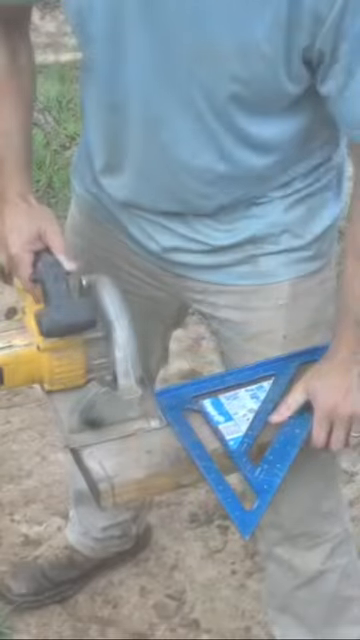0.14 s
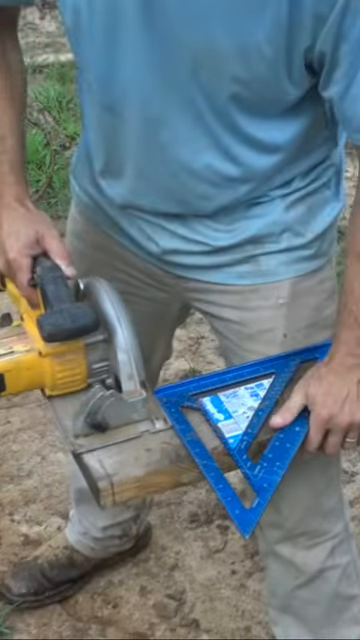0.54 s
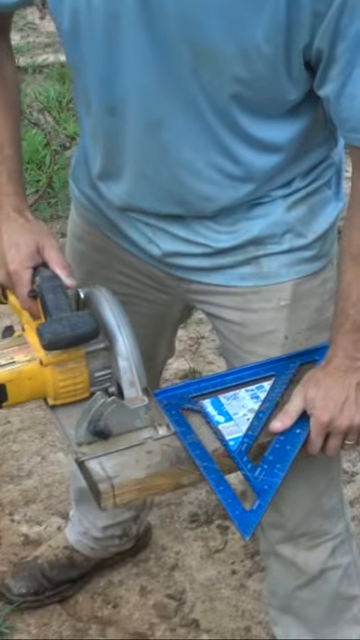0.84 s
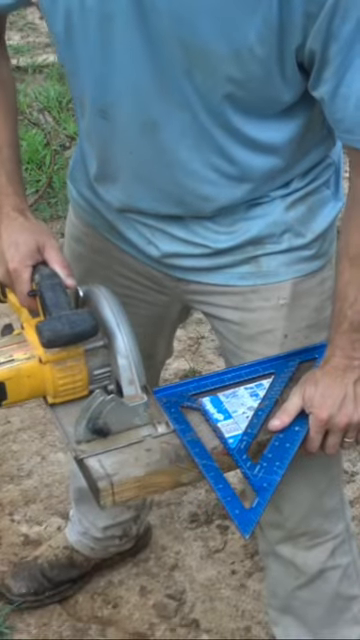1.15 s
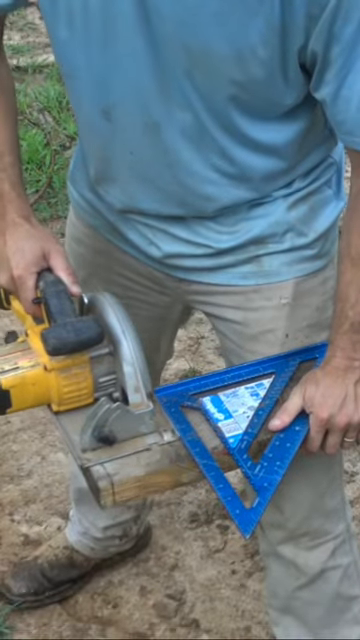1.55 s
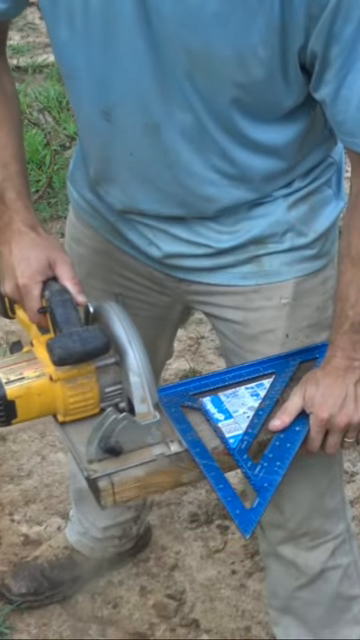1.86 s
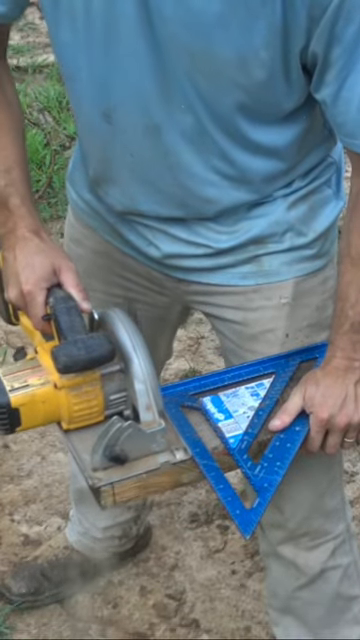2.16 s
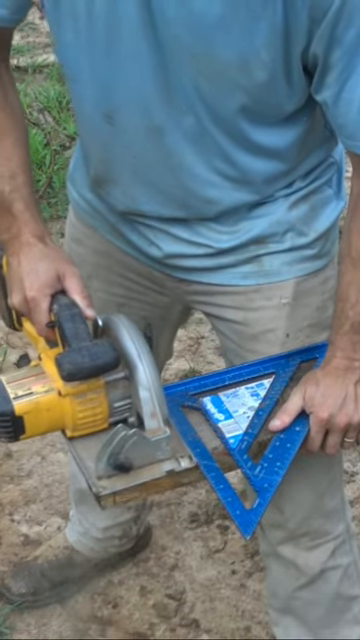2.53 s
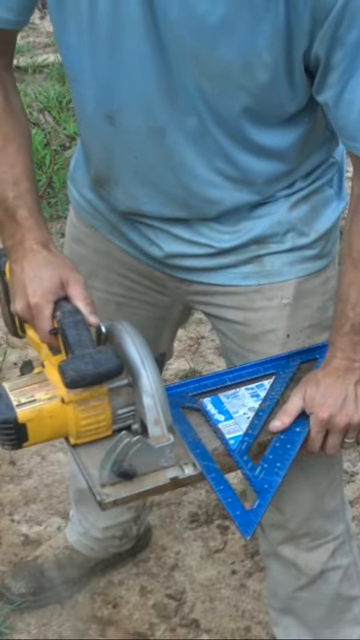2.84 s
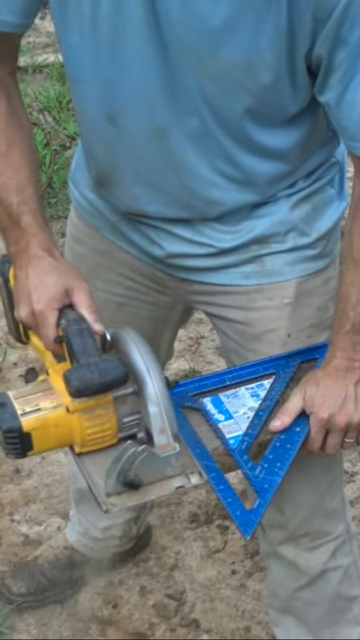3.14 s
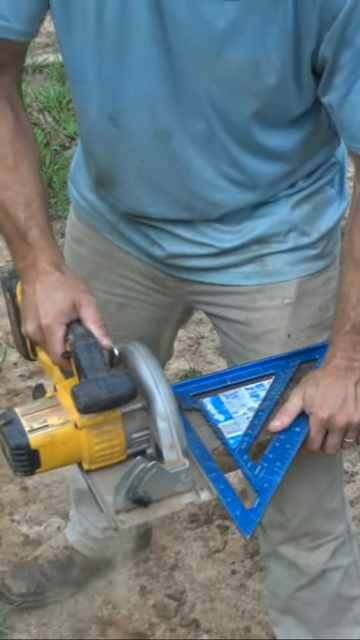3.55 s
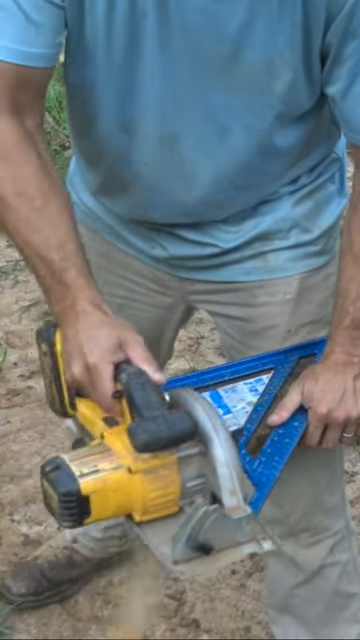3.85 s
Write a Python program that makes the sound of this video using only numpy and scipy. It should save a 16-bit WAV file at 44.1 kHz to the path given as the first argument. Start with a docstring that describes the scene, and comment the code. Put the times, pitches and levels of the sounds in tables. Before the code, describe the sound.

Handheld circular saw spins up with a sharp click, screams through wood, then stops with a clack

```python
"""After a moment of silence, insects shrill in a yard, to the left, over quiet air: coloured noise.
Close to the microphone a circular saw is lined up with soft knocks and slides; its trigger clicks twice.
The motor spins up through resonances; the blade cuts a board, labours, breaks free and is braked, the guard clacking.
Motor phase drives a rasp that repeats with every blade turn, a geared whine and singing blade harmonics;
hissing chips and rattle are noise with levels set over time."""
import sys
import numpy as np
from scipy import signal
from scipy.fft import rfft, irfft
from scipy.io import wavfile
from scipy.ndimage import uniform_filter1d

SR = 44100
rng = np.random.default_rng(int(sys.argv[2]) if len(sys.argv) > 2 else 0)


def materialize(psi):
    """Save the field psi as 16-bit PCM at rate SR to the path in sys.argv[1].

    A 1-D psi becomes a single channel; in a 2-D psi each row is a channel.
    """
    bounded = np.clip(np.atleast_2d(psi).T, -1, 1)
    quanta = np.round(bounded * 32767).astype(np.int16)
    wavfile.write(sys.argv[1], SR, quanta)


N = 176400
T = np.arange(N) / SR
FREQS = np.maximum(np.fft.rfftfreq(N, 1 / SR), 1)

# mean motor speed: t/s, rate/(turns per s)
MOTOR_SPEED = [(1.15, 2), (1.18, 55), (1.27, 182), (1.31, 224), (1.36, 299), (1.4, 343), (1.45, 372),
               (1.54, 390), (1.7, 360), (1.8, 347), (1.97, 333), (2.2, 331.5), (2.3, 342), (2.4, 344.5),
               (2.57, 335), (2.72, 334), (2.9, 323), (3, 312), (3.2, 265), (3.29, 256), (3.44, 281),
               (3.58, 290), (3.67, 334), (3.8, 386), (3.9, 412), (3.92, 355), (4, 100)]
PINION_TEETH, WHEEL_TEETH = 9, 46
# resonances of guard and housing: f/Hz, width/Hz, level/dB
HOUSING_MODES = [(912, 144, 5), (1513, 16, 7.5), (1663, 39, 8), (2270, 840, 6), (5540, 71, -5.5),
                 (5940, 160, -12.5), (6760, 51, -3.5), (8720, 45, 5.5), (11990, 190, -13)]


def undb(db):
    """Decibels to gain."""
    return 10 ** (np.asarray(db) / 20)


def unit(x):
    """Scale to rms 1."""
    return x / np.sqrt(np.mean(x ** 2) + 1e-18)


def curve(table, axis=1):
    """One column of a time table, joined by straight lines."""
    rows = np.array(table, float)
    return np.interp(T, rows[:, 0], rows[:, axis])


def response(points):
    """Gain per frequency from (f/Hz, level/dB) points, joined on a log frequency axis."""
    rows = np.array(points, float)
    return undb(np.interp(np.log(FREQS), np.log(rows[:, 0]), rows[:, 1]))


def shaped(x, gain):
    """Filter by a gain per frequency."""
    return irfft(rfft(x) * gain, N)


def noise(colour):
    """Coloured noise of rms 1."""
    return unit(shaped(rng.standard_normal(N), response(colour)))


def walk(rate_hz):
    """Smooth random wander up to about a rate, spread 1."""
    return unit(shaped(rng.standard_normal(N), 1 / (1 + (FREQS / rate_hz) ** 4)))


def wide_noise(colour):
    """Stereo noise: one part shared by both channels, a weaker part of its own in each."""
    own = np.array([noise(colour), noise(colour)])
    return unit(noise(colour) + 0.5 * own)


def yard():
    """An unevenly throbbing insect chorus to the left, over quiet outdoor air."""
    # spectrum of the insects: f/Hz, level/dB
    insect_colour = [(4000, -35.5), (4400, -17), (4650, -1.5), (4830, 1.5), (5050, -6.5), (5350, -12),
                     (6000, -26.5), (7600, -32.5), (8300, -26.5), (8800, -33), (9800, -23.5), (10800, -40),
                     (16000, -48)]
    # spectrum of the outdoor air: f/Hz, level/dB
    air_colour = [(25, -18), (75, -3), (194, -5.5), (299, -9.5), (1050, -10), (1410, -19), (3500, -22),
                  (4550, -51), (7700, -120)]
    insect_db, air_db = -38, -59.5
    throb_db, throb_hz = 1, 34
    left_minus_right_db = 5.3
    throb = undb(throb_db * walk(throb_hz))
    chorus = unit(noise(insect_colour) * throb) * undb(insect_db)
    pan = undb(np.array([[left_minus_right_db], [-left_minus_right_db]]) / 2)
    return chorus * pan + wide_noise(air_colour) * undb(air_db)


def draught():
    """Air moved by the spinning blade rumbles on the microphone, in proportion to motor speed."""
    # spectrum of the rumble: f/Hz, level/dB
    draught_colour = [(25, -14), (70, 5), (150, 0), (400, -23), (2000, -60)]
    full_speed_db, wander_db = -61.5, 2
    level = undb(full_speed_db + wander_db * walk(11.0))
    speed = curve(MOTOR_SPEED)
    return wide_noise(draught_colour) * level * speed / speed.max()


def fade(start_s, t60_s):
    """A sudden rise and an exponential decay."""
    age = np.maximum(T - start_s, 0)
    return (1 - np.exp(-age / 0.0001)) * np.exp(-np.log(1000) * age / t60_s)


def hits(table, colour):
    """Short noise bursts ring the struck part, each with a faint tail."""
    tail_db, tail_t60_s = -19, 0.13  # tail relative to its burst
    envelope = 0
    for start_s, db, t60_s in table:
        tail = undb(tail_db) * fade(start_s, tail_t60_s)
        envelope = envelope + undb(db) * (fade(start_s, t60_s) + tail)
    bursts = rng.standard_normal(N) * envelope
    # folding the cepstrum makes the filter minimum phase: nothing rings ahead of the blow
    cepstrum = irfft(np.log(unit(response(colour))), N)
    causal = np.concatenate([cepstrum[:1], 2 * cepstrum[1:N // 2]])
    return shaped(bursts, np.exp(rfft(causal, N)))


def handling():
    """The saw is lined up, the trigger clicks, the blade pings at the jolt, the guard clacks."""
    # soft knocks of the saw being set on the board: t/s, level/dB, t60/s
    knocks = [(.408, -48, 0.15), (.44, -42, 0.11), (.501, -48.5, 0.15), (.603, -47, 0.11),
              (.678, -46.5, 0.06), (.708, -51, 0.055)]
    # spectrum of the knocks: f/Hz, level/dB
    knock_colour = [(80, -31), (280, -6), (420, -10), (600, 0.5), (850, -18), (1200, -13), (1550, -12),
                    (2000, -22), (5000, -32)]
    # the shoe slides on the wood: middle t/s, half length/s, level/dB
    slide_times = [(0.6, 0.092, -53), (0.915, 0.12, -59)]
    # spectrum of the slides: f/Hz, level/dB
    slide_colour = [(1500, -10), (2080, -2), (2500, -10), (3150, 0.5), (6000, -19)]
    # trigger clicks: t/s, level/dB, t60/s
    clicks = [(.938, -53, .015), (1.069, -39, 0.16), (1.0915, -13, 0.024), (1.1445, -12, 0.065)]
    # spectrum of the clicks: f/Hz, level/dB
    click_colour = [(100, -30), (621, -1), (872, -2), (1830, 7), (2270, -6), (2580, 4), (3320, -6),
                    (4200, -6.5), (5900, -3), (6420, -16), (7940, -5.5), (10000, -13.5), (16000, -29)]
    # the guard clacks as the saw leaves the board: t/s, level/dB, t60/s
    clacks = [(3.9, -24, 0.11), (3.976, -14.5, 0.12)]
    # spectrum of the clacks: f/Hz, level/dB
    clack_colour = [(80, -22), (300, 2.5), (450, -8.5), (620, 1), (810, 7), (950, -8), (1500, -1),
                    (2500, 0.5), (5000, -13), (12000, -34)]
    ping_s, ping_hz, ping_db, ping_t60_s = 1.146, 3935, -27.5, 0.62
    strokes = 0
    for middle_s, length_s, db in slide_times:
        strokes = strokes + undb(db) * np.exp(-((T - middle_s) / length_s) ** 2)
    slides = noise(slide_colour) * strokes
    ping = undb(ping_db) * fade(ping_s, ping_t60_s) * np.sin(2 * np.pi * ping_hz * T)
    struck = hits(knocks, knock_colour) + hits(clicks, click_colour) + hits(clacks, clack_colour)
    return slides + ping + struck


def swells(table):
    """Short swells of noise, each in one resonance."""
    out = 0
    for middle_s, length_s, hz, width_hz, db in table:
        shape = np.exp(-((T - middle_s) / length_s) ** 2)
        resonance = 1 / (1 + ((FREQS - hz) / (width_hz / 2)) ** 4)
        ring = shape * shaped(rng.standard_normal(N), resonance)
        out = out + undb(db) * ring * np.linalg.norm(shape) / np.linalg.norm(ring)
    return out


def flares():
    """Housing resonances flare as the motor spins up through them."""
    # middle t/s, half length/s, f/Hz, width/Hz, level/dB
    flare_times = [(1.225, .012, 2200, 600, -24), (1.29, .07, 510, 90, -31), (1.31, .03, 1350, 200, -26)]
    return swells(flare_times)


def bites():
    """The teeth bite and snatch in the last of the wood, in short resonant bursts."""
    # middle t/s, half length/s, f/Hz, width/Hz, level/dB
    bite_times = [(3.558, .014, 1700, 800, -21), (3.573, .005, 1100, 400, -21),
                  (3.612, .012, 3800, 1400, -17.5), (3.617, .014, 950, 200, -22),
                  (3.643, .005, 1100, 450, -21), (3.835, .007, 1150, 350, -23)]
    return swells(bite_times)


def rattle():
    """Slack gears and blade give dense uneven metal ticks: decaying noise bursts at chance times."""
    # level of the rattle: t/s, level/dB
    rattle_level = [(1.15, -40), (1.25, -21), (1.45, -24), (1.7, -32.5), (3.26, -36), (3.3, -19.5),
                    (3.39, -16.5), (3.47, -31), (3.57, -20), (3.75, -29), (3.91, -20), (4, -40)]
    # spectrum of the rattle: f/Hz, level/dB
    rattle_colour = [(100, -46), (600, -26), (1000, -1), (1700, 5.5), (3500, -0.5), (16000, -18)]
    ticks_per_s, scatter_db, t60_s = 1300, 2, 0.021
    ticks = (rng.random(N) < ticks_per_s / SR) * undb(scatter_db * rng.standard_normal(N))
    decay = np.exp(-np.log(1000) / (t60_s * SR))
    bursts = signal.lfilter([1], [1, -decay], ticks)
    metal = unit(shaped(bursts * rng.standard_normal(N), response(rattle_colour)))
    return metal * undb(curve(rattle_level))


def turn_orders(turns, orders, gains):
    """Multiples of the blade rate, each at a chance phase, rms 1 together."""
    phases = rng.random(len(orders))
    return unit(sum(g * np.sin(2 * np.pi * (k * turns + p)) for k, g, p in zip(orders, gains, phases)))


def sing(turns):
    """A cluster of blade harmonics swells while the blade is deep in the wood; a few ring out alone."""
    # level of the cluster in the kerf: t/s, level/dB
    sing_level = [(1.3, -46), (2.3, -27), (2.95, -23.5), (3.3, -36), (3.9, -62)]
    # single harmonics that ring up: middle t/s, half length/s, multiple of the blade rate, level/dB
    squeals = [(2.38, .13, 74, -28), (2.47, .05, 72, -26), (2.52, .06, 77, -24), (2.67, .15, 78, -24),
               (2.68, .12, 70, -28), (2.72, .12, 69, -30), (2.36, .12, 83, -30), (3.135, .065, 94, -25.5),
               (2.35, .35, 14, -37), (2.9, .2, 15, -38), (2.85, .1, 79, -28), (1.88, .13, 26, -31),
               (2.25, .2, 27, -32), (2.03, .1, 23, -33), (3.03, .17, 3, -53), (3.33, .04, 32, -26),
               (3.4, .035, 80, -30)]
    centre_order, width_orders = 73, 30  # multiples of the blade rate
    cluster_flicker_db, squeal_flicker_db = 2, 3
    orders = np.arange(62, 92)
    gains = 1 / (1 + ((orders - centre_order) / (width_orders / 2)) ** 2)
    cluster = turn_orders(turns, orders, gains)
    lone = 0
    for middle_s, length_s, order, db in squeals:
        level = undb(db + squeal_flicker_db * walk(42))
        swell = np.exp(-((T - middle_s) / length_s) ** 4)
        lone = lone + level * swell * turn_orders(turns, [order], [1])
    return cluster * undb(curve(sing_level) + cluster_flicker_db * walk(40)) + lone


def whine(motor):
    """Pinion teeth mesh in a tone that smears into a noisy band when slack; the rotor hums beneath."""
    # gear whine: t/s, level/dB, roughness/(0-1, clipped)
    mesh_level = [(1.16, -45, 0.8), (1.21, -21, 0.47), (1.31, -16.5, 0.68), (1.46, -28, 0.9),
                  (1.56, -26.5, .1), (1.68, -32, 0.94), (1.85, -25, .1), (2.1, -42, .4), (2.4, -24, 0),
                  (2.75, -40, 0.3), (3.19, -22, 0.3), (3.39, -24.5, 0), (3.46, -15, 0.2), (3.53, -23, 0.3),
                  (3.59, -31, 0.9), (3.68, -27, .4), (3.82, -32, 0.6), (3.96, -16.5, 1), (4, -22.5, 1.1)]
    # octave of the gear whine: t/s, level/dB
    octave_level = [(1.16, -40), (1.4, -25.5), (1.6, -21.5), (1.72, -30), (2.05, -26), (2.6, -31),
                    (3.3, -37), (3.52, -21), (3.6, -28), (3.85, -27), (4, -51)]
    # hum at the motor rate: t/s, level/dB
    hum_level = [(1.2, -69), (1.45, -39.5), (1.6, -45.5), (2.1, -53), (2.4, -46), (2.75, -44.5), (3, -53.5),
                 (3.6, -50.5), (3.8, -40.5), (3.92, -40.5), (4, -59)]
    # tone of the free-running motor at three times its rate: t/s, level/dB
    fan_level = [(1.2, -72), (1.4, -44), (1.7, -33.5), (3.7, -46), (3.83, -30.5), (3.9, -21), (3.94, -50)]
    sideband_rad, skirt_hz, octave_rough = 0.5, 140, 0.8
    mesh_flicker_db, hum_flicker_db = 1.8, 0.42
    roughness = np.clip(curve(mesh_level, axis=2), 0, 1)
    parts = [(1, curve(mesh_level), roughness), (2, curve(octave_level), octave_rough)]
    out = 0
    for k, db, rough in parts:
        skirt = (walk(k * skirt_hz) + 1j * walk(k * skirt_hz)) / np.sqrt(2)
        # the phase wobbles once per motor turn, which adds sidebands
        wobble = sideband_rad * np.sin(2 * np.pi * (motor + rng.random()))
        tone = np.exp(1j * (2 * np.pi * k * PINION_TEETH * motor + wobble))
        mesh = (np.sqrt(1 - rough ** 2) + rough * skirt) * tone
        out = out + undb(db + mesh_flicker_db * walk(17)) * mesh.real
    hum = undb(curve(hum_level)) * np.sin(2 * np.pi * motor)
    fan = undb(curve(fan_level)) * np.sin(2 * np.pi * 3 * motor)
    return np.sqrt(2) * (out + (hum + fan) * undb(hum_flicker_db * walk(18)))


def per_turn(turns):
    """A random pattern around the blade that comes back each turn and slowly changes."""
    memory = 0.918  # share of the pattern kept from one turn to the next
    pattern = rng.standard_normal((260, 512))  # turns, points around the blade
    pattern[0] /= np.sqrt(1 - memory ** 2)  # the first turn is as strong as the later ones
    drifting = signal.lfilter([1], [1, -memory], pattern, axis=0)
    track = signal.resample_poly(drifting.ravel(), 4, 1)  # now 2048 points a turn
    return unit(np.interp(turns * 2048, np.arange(len(track)), track))


def blade_modes():
    """The steel blade's many narrow modes, spaced by chance: peaks and dips above the first housing mode."""
    ripple_db, mode_hz = 1.1, 45
    size = int(mode_hz * N / SR)
    smooth = uniform_filter1d(rng.standard_normal(len(FREQS)), size)
    ripple = unit(uniform_filter1d(smooth, size))
    onset = np.clip(FREQS / HOUSING_MODES[0][0] - 1, 0, 1)
    return undb(ripple_db * ripple * onset)


def roar(turns):
    """Teeth rasp alike on every turn; chips and air hiss afresh; both ring guard and housing."""
    # level of each band over time: t/s, then level/dB of bass, low middle, high middle,
    # low treble, treble, top
    band_levels = [(1.17, -25, -29, -35, -26.5, -42, -58), (1.22, -39, -26, -42, -26.5, -29, -55),
                   (1.29, -30.5, -26, -29, -18.5, -23, -30), (1.34, -31.5, -21, -20.5, -17.5, -28, -23.5),
                   (1.46, -37, -27.5, -34.5, -20.5, -21, -20), (1.9, -42, -27.5, -25.5, -19, -21.5, -19),
                   (2.92, -41, -25, -25.5, -20, -19, -25), (3.12, -38, -26, -20, -20, -21.5, -25),
                   (3.61, -38.5, -21, -22, -19, -22, -27.5), (3.78, -37.5, -25, -20.5, -18, -20, -26),
                   (3.92, -31.5, -31, -19.5, -19.5, -32, -43), (4, -39, -23, -37, -38, -41, -50)]
    # bands: upper edge f/Hz, share of power that repeats each turn/(0-1), steady level of the band/dB
    bands = [(782, 0.8, -2), (2280, 0.67, -1), (4490, 0.77, -1), (8180, 0.57, -1.5), (12200, 0.62, -0.5),
             (18000, 0.17, -2)]
    # colour within the bands: f/Hz, level/dB
    roar_colour = [(50, -45), (110, -38), (180, -14.5), (320, -11.5), (420, -11), (540, -5), (740, -9),
                   (840, -3), (920, 5.5), (1150, 8.5), (1700, 5), (2400, -3.5), (3100, 6.5), (5100, 3),
                   (6600, 5.5), (7800, 2.5), (9600, 3.5), (12000, 2.5), (13500, -5), (16000, -15)]
    throb_db, flutter_db = 0.66, 1
    rings = sum(undb(db) / (1 + ((FREQS - hz) / (width / 2)) ** 2) for hz, width, db in HOUSING_MODES)
    body = response(roar_colour) * (1 + rings) * blade_modes()
    rasp, hiss = per_turn(turns), rng.standard_normal(N)
    turn_throb = turn_orders(turns, range(1, 6), 1 / np.sqrt(np.arange(1, 6)))
    throb = undb(throb_db * turn_throb + flutter_db * walk(23.0))
    out, below = 0, 0
    for k, (edge_hz, share, band_db) in enumerate(bands):
        upto = 1 / (1 + (FREQS / edge_hz) ** 16)
        mixed = np.sqrt(share) * rasp + np.sqrt(1 - share) * hiss
        band = shaped(mixed, body * (upto - below))
        # level out the band over 0.1 s so that the tables set its loudness
        band = band / np.sqrt(uniform_filter1d(band ** 2, size=4410) + 1e-12)
        out = out + band * undb(curve(band_levels, axis=k + 1) + band_db)
        below = upto
    return out * unit(throb)


def scene():
    """The saw a little to the left, with a weak spread-out stereo part, in the yard."""
    # left minus right for the saw: f/Hz, level/dB
    saw_pan = [(150, 1), (800, 3.2), (1400, 2.8), (2800, 1), (5500, .45), (12000, .3)]
    # weak side part of the saw, opposite in the two channels: f/Hz, level/dB
    saw_side = [(130, -17), (300, -20), (1000, -21), (4000, -26), (12000, -28)]
    speed_jitter = 0.001274  # share of the speed
    motor = np.cumsum(curve(MOTOR_SPEED) * (1 + speed_jitter * walk(24.4))) / SR  # turns
    turns = motor * PINION_TEETH / WHEEL_TEETH  # of the blade
    running = np.clip((T - MOTOR_SPEED[0][0]) / 0.04, 0, 1)
    driven = roar(turns) + whine(motor) + sing(turns) + rattle() + flares() + bites()
    saw = running * driven + handling()
    # a short decaying noise smears the side part in time
    smear = rng.standard_normal(2000) * np.exp(-np.arange(2000) / 500)
    smear = smear / np.linalg.norm(smear)
    side = signal.fftconvolve(shaped(saw, response(saw_side)), smear)[:N]
    pan = np.sqrt(response(saw_pan))
    stereo = np.array([shaped(saw, pan) + side, shaped(saw, 1 / pan) - side])
    return stereo + draught() + yard()


def record(dry):
    """Sound begins after a moment of silence; gain control steadies the roar, peaks are rounded, the top is cut."""
    start_s, top_hz = 0.035, 15900
    threshold_db, reaction_s, slope = -11, 0.035, 0.41  # slope: share of the excess dB removed
    keep = np.exp(-1 / (reaction_s * SR))
    power = signal.lfilter([1 - keep], [1, -keep], np.mean(dry ** 2, axis=0))
    gain = np.maximum(np.sqrt(power) / undb(threshold_db), 1) ** -slope
    rounded = np.tanh(0.8 * dry * gain) / 0.84 * (T > start_s)
    top_cut = signal.ellip(10, 0.2, 80, top_hz, fs=SR, output="sos")
    return signal.sosfilt(top_cut, rounded)


dry = scene()
out = record(dry)
materialize(out)
```